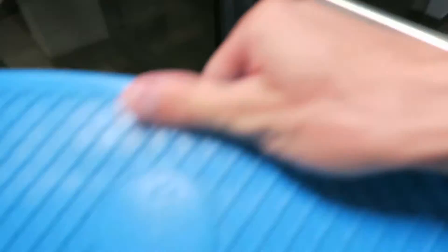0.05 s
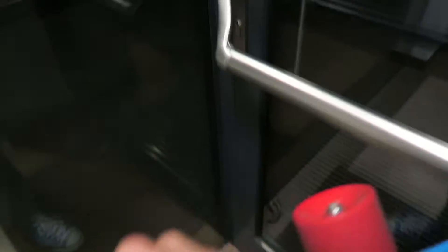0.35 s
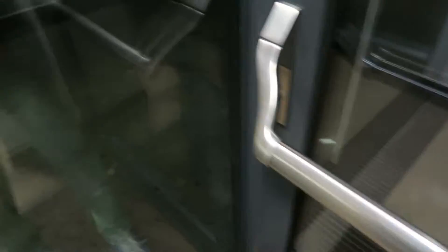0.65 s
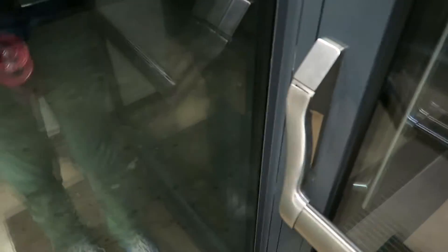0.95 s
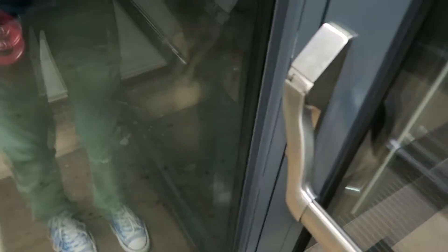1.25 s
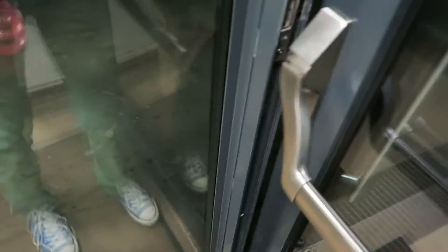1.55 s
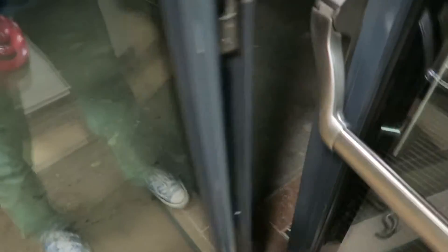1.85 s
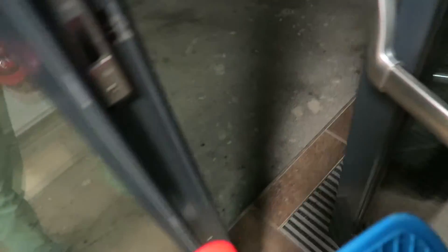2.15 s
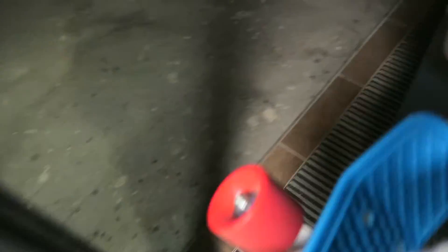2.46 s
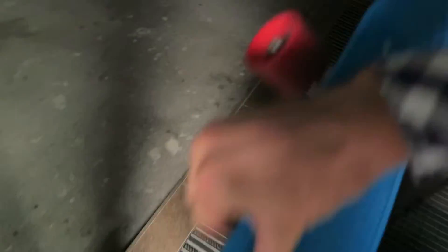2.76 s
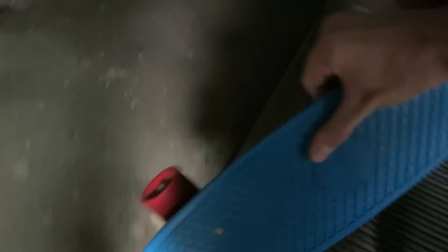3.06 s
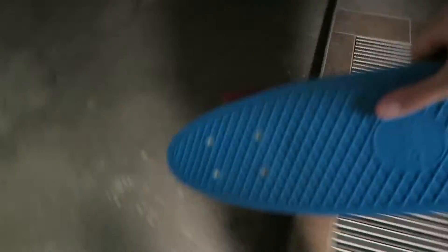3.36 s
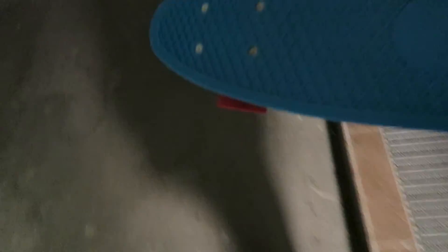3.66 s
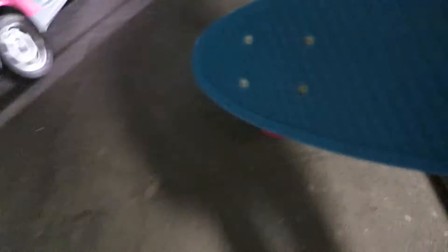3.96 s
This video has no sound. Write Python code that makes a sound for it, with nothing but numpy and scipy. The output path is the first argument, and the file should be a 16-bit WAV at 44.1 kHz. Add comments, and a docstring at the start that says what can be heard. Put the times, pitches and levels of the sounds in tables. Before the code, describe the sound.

Sharp steel latch clacks and low booms sound as a nearby push-bar door opens in an echoing hall. A plastic skateboard then taps and knocks against the door, with brief rubs over an airy rumble and ventilation hum.

```python
"""The airy rush and ventilation hum of an echoing building come first, with soft rubs and a dull knock.
A glass door in a metal frame is pushed open by its bar: impacts set the steel latch ringing, and the
leaf booms in its low modes and comes free with a puff of air. The rush of the space beyond swells,
a low drone glides as the door swings, and a carried plastic skateboard clatters against the door.
Each impact and rub is followed by the reverberation of the hall."""
import sys
import numpy as np
from scipy import signal
from scipy.fft import rfft, irfft, next_fast_len
from scipy.io import wavfile
from scipy.ndimage import map_coordinates

SR = 44100
rng = np.random.default_rng(int(sys.argv[2]) if len(sys.argv) > 2 else 0)


def generate_wav(sig):
    """Save sig (samples, or channels by samples) to the path in sys.argv[1] as 16-bit PCM at SR."""
    pcm = np.round(np.clip(np.atleast_2d(sig).T, -1, 1) * 32767).astype(np.int16)
    wavfile.write(sys.argv[1], SR, pcm)


N = 176400


def amp(db):
    """Amplitude ratio of a level: tenfold for every 20 dB."""
    return 10 ** (np.asarray(db) / 20)


def unit(x):
    """Normalisation to an rms of 1."""
    return x / np.sqrt(np.mean(x ** 2) + 1e-20)


def along(points, hz):
    """Interpolation of (frequency [Hz], value) points on a logarithmic frequency axis."""
    frequencies, values = np.transpose(points)
    return np.interp(np.log(hz + 1), np.log(frequencies + 1), values)


def curves(rows):
    """Linear interpolation in time: one curve for each column after the first."""
    times, *columns = np.transpose(rows)
    return [np.interp(np.arange(N) / SR, times, column) for column in columns]


def wobble(rate):
    """Smooth random modulation: a spline through `rate` random knots a second."""
    return map_coordinates(rng.standard_normal(2048), [np.arange(N) * rate / SR], mode="wrap")


def phase(hz):
    """Phase as the time integral of frequency."""
    return 2 * np.pi * np.cumsum(hz) / SR


def noise(colour, size, tilt_db=0, knee_hz=400):
    """Partly coherent stereo noise of rms 1, tilted by tilt_db an octave above the knee."""
    # likeness of the sound at two close points (frequency [Hz], coherence [ratio])
    coherence = [(70, .999), (130, 0.92), (250, 0.83), (500, 0.92), (2000, 0.94), (4000, 0.84),
                 (8000, 0.26), (13000, 0.1)]
    hz = np.fft.rfftfreq(size, 1 / SR)
    angle = np.arccos(np.clip(along(coherence, hz), -1, 1)) / 2
    gain = amp(along(colour, hz) + tilt_db * np.log2(hz + knee_hz))
    spectra = rfft(rng.standard_normal((2, size))) * gain
    mid, side = irfft(spectra * [np.cos(angle), np.sin(angle)], size)
    return unit(np.array([mid + side, mid - side]))


def add_in_hall(out, start, sound, wet_db):
    """Reverberation: mix in the direct sound and a diffuse tail that lasts longest in the bass."""
    # reverberation time of the hall (frequency [Hz], t60 [s])
    hall = [(60, 1.3), (250, 1.34), (700, 1.02), (2000, 0.72), (5000, 0.47), (9000, 0.54), (15000, 0.49)]
    white = noise([(1, 0), (SR, 0)], size=SR)
    hz, t, spectra = signal.stft(white, SR, nperseg=256)
    decay = amp(-60 * t / along(hall, hz)[:, None])
    tail = signal.istft(spectra * decay, SR, nperseg=256)[1]
    response = amp(wet_db) * tail / np.linalg.norm(tail[0])
    heard = signal.fftconvolve(sound.mean(0)[None], response, axes=1)
    heard[:, :sound.shape[1]] += sound
    part = out[:, round(start * SR):][:, :heard.shape[1]]
    part += heard[:, :part.shape[1]]


def ring(modes, ratio, scatter_db, spread_rad=0.12):
    """Free vibration: damped modes, each with a random level and left-right phase difference."""
    t = np.arange(SR // 2) / SR
    out = np.zeros((2, len(t)))
    for hz, db, t60 in modes:
        envelope = amp(db + scatter_db * rng.normal() - 60 * t / t60)
        offset = spread_rad * rng.normal() * np.array([[1], [-1]])
        out += envelope * np.sin(2 * np.pi * hz * ratio * t + offset)
    return out


def crack(colour, tilt_db, t60, rise_s, peaks_db=3, peak_spacing_hz=400):
    """Modal overlap: an impact rings as decaying noise; each contact point favours its own broad peaks."""
    t = np.arange(SR // 2) / SR
    hz = np.fft.rfftfreq(len(t), 1 / SR)
    ripple = map_coordinates(rng.standard_normal(512), [hz / peak_spacing_hz], mode="wrap")
    resonances = amp(peaks_db * ripple * hz / (hz + 1000))  # flatter in the bass
    spectrum = rfft(noise(colour, size=len(t), tilt_db=tilt_db))
    body = unit(irfft(spectrum * resonances, len(t)))
    return body * amp(-60 * t / max(t60, .002)) * (1 - np.exp(-t / rise_s))


def rush(waver_db=1.1):
    """Broadband noise: the building's rush swells as the door opens, under a hiss of sleeve and handling."""
    # course of the rush (time [s], rumble level [dB], middle level [dB], treble level [dB])
    rush_levels = [(0, -64, -34, -43.5), (.35, -49.5, -34.5, -42.5), (.85, -42, -39, -46.5),
                   (1.15, -22, -22.5, -33), (1.5, -20, -32.5, -39), (1.799, -35.5, -43.5, -55),
                   (2.08, -35.5, -41, -50.5), (2.35, -25.5, -32.5, -42), (2.7, -29.5, -29.5, -38),
                   (3.051, -49, -30.5, -43.5), (3.25, -31, -26, -37), (3.449, -27.5, -25.5, -38.5),
                   (3.7, -30.5, -26.5, -40), (4, -24.5, -27, -38)]
    # course of the hiss (time [s], level [dB])
    hiss_levels = [(0, -51.5), (.25, -55), (.33, -47), (.42, -53), (.63, -54), (.69, -47), (.78, -56.5),
                   (1.4, -68), (1.8, -73), (2.2, -61), (2.45, -50.5), (3.25, -53), (3.6, -58), (4, -74)]
    # spectra of the three bands of the rush and of the hiss (frequency [Hz], level [dB])
    rumble = [(24, -22), (42, -1), (70, 2.5), (130, 3.5), (210, 0), (300, -7), (600, -80)]
    middle = [(100, -8.5), (200, -4.5), (330, 2), (700, -2.5), (1100, -6), (1600, -9.5), (2500, -15.5),
              (13000, -65)]
    treble = [(700, 0.5), (1500, -6.5), (2400, 1.5), (4000, -3), (6300, -9), (9000, -16), (12300, -29),
              (14000, -52)]
    hiss = [(2000, -16), (6200, 0), (8000, -6.5), (12300, -3), (13300, -9), (16000, -9)]
    bands = zip(curves(rush_levels) + curves(hiss_levels), (rumble, middle, treble, hiss))
    return sum(amp(db + waver_db * wobble(16)) * noise(colour, size=N) for db, colour in bands)


def hum(hz=137.2, wander_hz=2.05, waver_db=2.4):
    """Ventilation hum: one tone under random amplitude and frequency modulation."""
    # course of the hum (time [s], level [dB])
    levels = [(0, -55), (.3, -41), (.9, -41), (1.7, -43), (1.92, -30), (2.02, -34), (2.15, -27.5),
              (2.45, -23.5), (2.75, -28.5), (3, -24), (3.2, -21), (3.5, -27.5), (4, -26)]
    rms = amp(curves(levels)[0] + waver_db * wobble(13))
    return np.sqrt(2) * rms * np.sin(phase(hz + wander_hz * wobble(20)))


def drone(start_s=2.04, fade_s=0.27, third_db=-14.5):
    """A harmonic series: three low partials glide together while the door swings."""
    # course of the drone (time [s], pitch [Hz], fundamental level [dB], octave level [dB])
    glide = [(2.2, 29, -41, -27), (2.32, 30.7, -46, -25), (2.39, 39.1, -25, -23), (2.44, 40.8, -27, -13.5),
             (2.52, 43.7, -22, -12.5), (2.63, 46, -26.5, -17.5), (2.72, 45.6, -22, -25.5),
             (2.83, 42.9, -26, -14), (2.93, 43.97, -27, -11), (3.13, 43.96, -23.5, -16.5),
             (3.27, 47.3, -29, -32), (3.48, 51.2, -20, -32), (3.82, 51, -22, -28.5), (3.96, 46.7, -40, -40)]
    hz, first_db, octave_db = curves(glide)
    angle = phase(hz)
    odd = amp(first_db) * (np.sin(angle) + amp(third_db) * np.sin(3 * angle))
    octave = amp(octave_db) * np.sin(2 * angle)
    fade_in = np.clip((np.arange(N) / SR - start_s) / fade_s, 0, 1)
    return np.sqrt(2) * (odd + octave) * fade_in


def rubs(edge_s=.008):
    """Friction excites one resonance for the length of each stroke, heard as a band of noise."""
    # rubs and squeaks of door and board (time [s], pitch [Hz], bandwidth [Hz], level [dB], length [s])
    strokes = [(0, 300.8, 61.1, -42.5, 0.31), (0, 6130, 258, -53, 0.12), (0.209, 1680, 393, -30, 0.034),
               (0.27, 1135, 904, -36.5, 0.075), (0.666, 2082, 2810, -37, 0.057),
               (2.259, 413, 89.5, -33.5, 0.2), (2.299, 207.3, 32.3, -28, 0.26),
               (2.821, 510, 107, -26, 0.057), (2.823, 760, 254, -19, 0.04), (3.128, 752, 228, -26, 0.166),
               (3.293, 690, 245, -28.5, 0.12), (3.183, 330.7, 26.3, -31, 0.12),
               (3.28, 509.5, 69.7, -32.5, 0.24), (3.38, 698.7, 194, -25, 0.065),
               (3.379, 1305, 698, -30.5, 0.1)]
    out, t = np.zeros((2, N)), np.arange(SR // 2) / SR
    for start, hz, width, db, length in strokes:
        roughness = (wobble(width) + 1j * wobble(width))[:len(t)]
        envelope = np.clip(t / edge_s, 0, 1) * np.clip((length - t) / (2 * edge_s), 0, 1)
        moan = np.real(roughness * np.exp(2j * np.pi * hz * t)) * envelope
        rub = amp(db) * unit(moan) * np.sqrt(np.mean(envelope ** 2))
        add_in_hall(out, start, np.array([rub, rub]), wet_db=-7.5)
    return out


def clatter():
    """Damped impacts of board and bar: hard taps and hollow knocks with no clear pitch."""
    # the board and its trucks tap the door (time [s], level [dB], tilt [dB/octave], t60 [s])
    taps = [(2.627, -13, 4.5, 0.041), (2.692, -24, 8, 0.021), (2.756, -13, -3, .04),
            (2.763, -9.5, -1, 0.048), (2.777, -21, 2, 0.032), (2.8129, -8, -2, 0.023),
            (2.919, -16.5, -5, .03), (3.012, -25.5, -2.5, 0.017)]
    # dull knocks of bar and board (time [s], level [dB], tilt [dB/octave], t60 [s])
    knocks = [(.212, -26, -0.5, 0.18), (.59, -27, -7.5, 0.084), (.945, -21, 0, 0.094),
              (1.071, -23.5, 6, 0.41), (1.13, -15.5, -1, 0.08), (1.325, -14, -14, 0.21),
              (1.392, -20.5, 1.5, 0.11), (1.47, -18.5, -11.5, 0.19), (2.775, -16, -4.5, 0.2),
              (2.825, -12.5, -9, 0.14), (2.921, -16, -6, 0.11), (2.966, -27, -1, .16),
              (3.382, -23, -3.5, 0.26), (3.833, -17.5, -6.5, .11)]
    # spectra of a tap and a knock before the tilt (frequency [Hz], level [dB])
    tap_colour = [(150, -4), (700, -4.5), (1500, -5), (3200, 0.5), (5500, -1.5), (8000, -9.5), (12000, -19),
                  (15000, -30)]
    knock_colour = [(80, -48), (200, -7), (480, 3), (600, 3), (760, -2), (1100, 0.5), (1800, -4),
                    (3500, -10), (8000, -29), (15000, -51)]
    out = np.zeros((2, N))
    for start, db, tilt, t60 in taps:
        add_in_hall(out, start, amp(db) * crack(tap_colour, tilt, t60, rise_s=0.0007), wet_db=-4)
    for start, db, tilt, t60 in knocks:
        add_in_hall(out, start, amp(db) * crack(knock_colour, tilt, t60, rise_s=0.0013), wet_db=-3)
    return out


def puff(start_s=1.485, rise_s=.015, t60=.6, db=-13):
    """A pressure transient: the seal lets go with a low push of air."""
    # spectrum of the push of air (frequency [Hz], level [dB])
    colour = [(24, -15), (40, 16), (60, -14), (95, 0), (150, -26), (400, -84)]
    t = np.maximum(np.arange(N) / SR - start_s, 0)
    envelope = (1 - np.exp(-t / rise_s)) * amp(-60 * t / t60)
    return amp(db) * envelope * noise(colour, size=N)


def leaf(rise_s=0.0014):
    """Plate vibration: each shove sets the glazed leaf booming in its low modes."""
    # shoves on the door (time [s], level [dB], mode frequency factor [ratio])
    shoves = [(0.21, -28, 1.05), (0.599, -37, 1.05), (0.942, -23, 1.1), (.995, -22, 1), (1.029, -20.5, 1),
              (1.075, -13.5, 1), (1.116, -13.5, 1.1), (1.251, -11, 1.15), (1.264, -7.5, 1.18),
              (1.286, -8.5, 1), (1.321, -7, 1), (1.426, -16, 1.25), (1.521, -19, 1.1), (2.93, -9, 1.12),
              (2.957, -12.5, 1.02), (3.839, -19, 1.05)]
    # modes of the leaf (nominal frequency [Hz], level [dB], t60 [s])
    modes = [(95.2, -8, 0.24), (106.6, -10.5, 0.81), (139.8, 1.5, 0.22), (180, -3.5, 0.19),
             (215.8, -3, 0.088), (275.4, -6, 0.12)]
    out = np.zeros((2, N))
    onset = 1 - np.exp(-np.arange(SR // 2) / SR / rise_s)
    for start, db, ratio in shoves:
        boom = ring(modes, ratio, scatter_db=3.5, spread_rad=0.077)
        add_in_hall(out, start, amp(db) * onset * boom, wet_db=-9)
    return out


def latch(wet_db=-9.5):
    """Impact excitation: steel strikes steel and the bar rings; the spring pings, the linkage grinds."""
    # strikes of latch and push bar (time [s], level [dB], tilt [dB/octave], contact t60 [s])
    strikes = [(.9365, -21.5, -4, .035), (1.027, -28, -2.5, 0.032), (1.0673, -10, 0, 0.015),
               (1.098, -22, -3, 0.057), (1.115, -5.5, 18, 0.021), (1.117, -1.5, 2, 0.014),
               (1.1243, -11.5, 1.5, 0.053), (1.134, -9.5, -7, 0.041), (1.1757, -9.5, -1.5, 0.013),
               (1.187, -23, 1.5, 0.055), (1.2555, -23, -10, 0.016), (1.2905, -17.5, 1, .04),
               (1.3005, -18, -6, 0.1), (1.322, 8, -3.5, 0.0054), (1.3255, -10, -2.5, .02),
               (1.3275, -6.5, -0.5, 0.027), (1.339, -15, 1.5, 0.05), (1.5164, -28.5, -3.5, 0.026)]
    # spectrum of a steel contact before the tilt (frequency [Hz], level [dB])
    colour = [(150, -6), (600, -11), (1300, -1.5), (2500, -3), (4500, 4), (6500, -2), (9000, -5.5),
              (12000, -12.5), (15000, -21)]
    # modes of the bar and of the spring (nominal frequency [Hz], level [dB], t60 [s])
    bar_modes = [(1696, -7, 0.048), (2140, -3, .06), (2840, -7, 0.082), (3430, -13, 0.081),
                 (4350, -10, 0.055), (4840, -1, 0.056), (5700, -1, 0.03), (6700, -4, 0.033)]
    spring_modes = [(6600, -0.5, 0.15)]
    out = np.zeros((2, N))
    for start, db, tilt, t60 in strikes:
        bar_gain = amp(-17) * t60 / .03  # a longer contact rings the bar more strongly
        bar = bar_gain * ring(bar_modes, ratio=1 + .022 * rng.normal(), scatter_db=2.5)
        contact = crack(colour, tilt, t60, rise_s=0.00042)
        add_in_hall(out, start, amp(db) * (contact + bar), wet_db)
    ping = amp(-33) * ring(spring_modes, ratio=0.97, scatter_db=5.0)
    add_in_hall(out, start=.938, sound=ping, wet_db=wet_db)  # at the first touch
    # the grind is a run of irregular slips while the bar travels
    grind_start_s, grind_length_s, slips = 1.06, .16, 14
    for k, jitter in enumerate(rng.random(size=slips)):
        slip = amp(-25) * crack(colour, tilt_db=-1, t60=.018, rise_s=0.00051)
        add_in_hall(out, grind_start_s + grind_length_s * (k + jitter) / slips, slip, wet_db)
    return out


def scene():
    """Superposition of all the sources around the doorway."""
    return latch() + clatter() + leaf() + puff() + rubs() + rush() + drone() + hum()


def record(dry, top_hz=16100):
    """Frequency response and overload: the microphones colour the sound, clip it and limit its band."""
    # response lifting the deepest bass, with the treble falling away above 12 kHz (frequency [Hz], gain [dB])
    response = [(20, 5), (36, -0.5), (12300, -0.5), (13200, -4), (16000, -16)]
    # imbalance of the pair (frequency [Hz], left minus right [dB])
    balance = [(125, 1), (190, -3), (255, 0), (370, -5.5), (500, 0)]
    size = next_fast_len(N + SR // 2)
    hz = np.fft.rfftfreq(size, 1 / SR)
    gain = amp(along(response, hz) + along(balance, hz) * np.array([[.5], [-.5]]))
    coloured = irfft(rfft(dry, size) * gain, size)
    clipped = np.clip(coloured, -1, 1)
    return irfft(rfft(clipped) * (hz < top_hz), size)[:, :N]


dry = scene()
out = record(dry)
generate_wav(out)
```